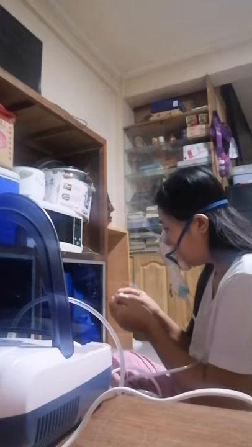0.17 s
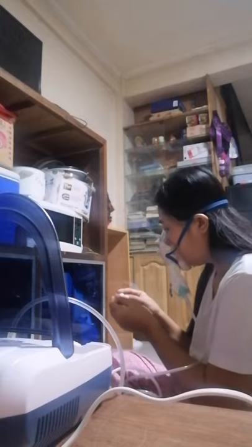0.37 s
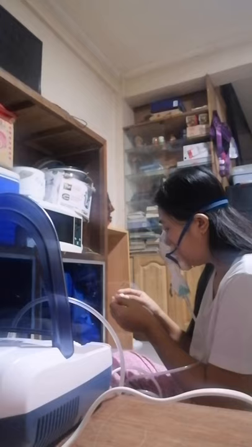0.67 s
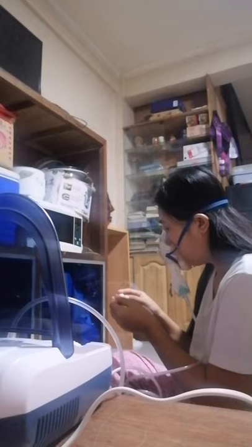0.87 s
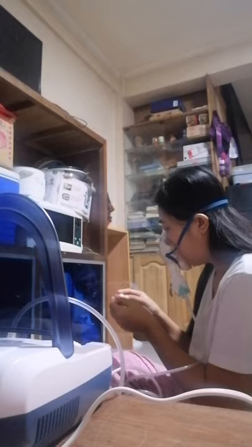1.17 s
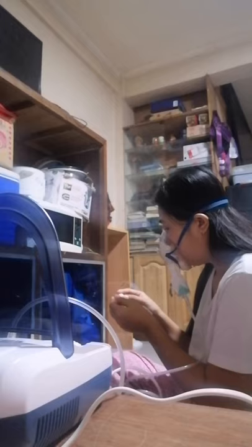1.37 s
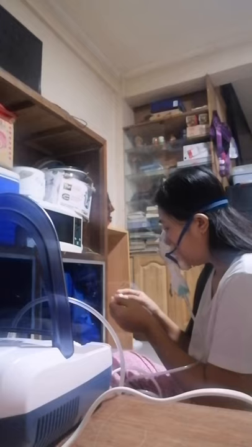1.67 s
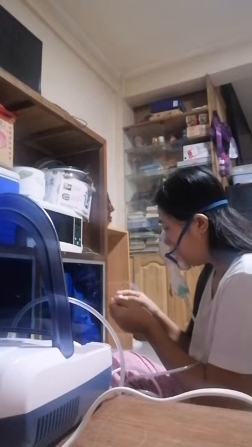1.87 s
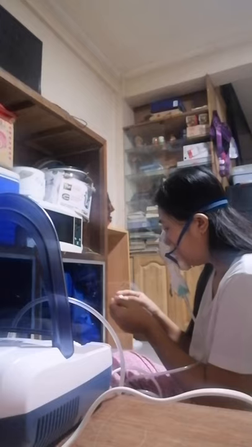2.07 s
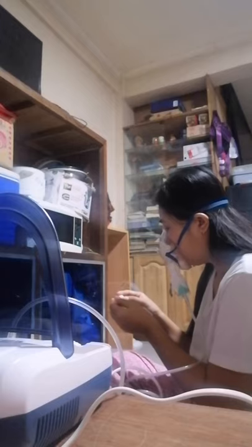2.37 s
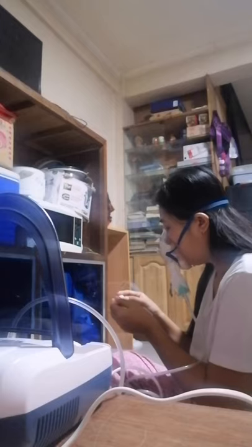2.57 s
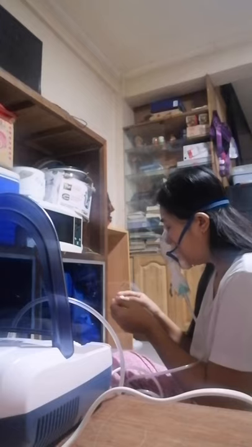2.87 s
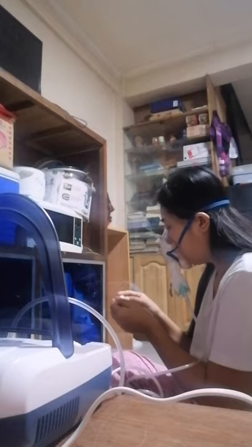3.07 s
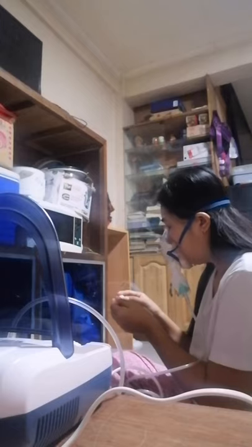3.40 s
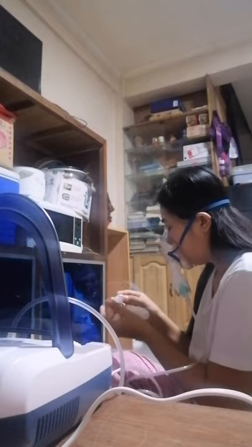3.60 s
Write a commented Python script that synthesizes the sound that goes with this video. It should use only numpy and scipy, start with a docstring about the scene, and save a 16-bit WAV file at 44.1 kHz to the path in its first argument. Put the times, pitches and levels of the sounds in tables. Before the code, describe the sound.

A nebulizer motor drones steadily indoors, close by and slightly to the right, with a rapid thumping rattle over a rough rush of air. Along with it come a high hiss, a faint whistle and small irregular spits of liquid.

```python
"""A small piston air compressor is already running on a shelf, close to a phone's right microphone.
From the start, every turn of its shaft thumps, knocks a valve and rattles the case, while the
mains hum beats against it over a rough rush. Across the room the mist jet hisses and whistles faintly.
Within moments droplets spit at the jet, and they sputter on unevenly to the end."""
import sys
import numpy as np
from scipy import signal
from scipy.io import wavfile
from scipy.ndimage import uniform_filter1d

SR = 44100
rng = np.random.default_rng(int(sys.argv[2]) if len(sys.argv) > 2 else 0)


def persist_wave(psi):
    """Save psi, clipped to +-1, as 16-bit WAV."""
    counts = np.round(np.clip(psi, -1, 1) * 32767).astype(np.int16)
    wavfile.write(sys.argv[1], SR, np.atleast_2d(counts).T)


N = 164934


def amp(db):
    return 10 ** (np.asarray(db) / 20)


def unit_rms(x):
    return x / np.sqrt(np.mean(x ** 2) + 1e-20)


def look_up(table, hz, column=1):
    rows = np.array(table, float)
    return np.interp(np.log(hz + 1), np.log(rows[:, 0] + 1), rows[:, column])


def ringing_phase(db):
    """Phases that make tones of these levels start as one sudden blow and ring on."""
    mirrored = np.log(amp(np.concatenate([db, db[-2:0:-1]])))
    return -signal.hilbert(mirrored).imag[:len(db)]


SHAFT_HZ, MAINS_HZ = 56.1486, 120.404

def shaft_turns(t, wander_turns=.0013):
    """How far the shaft has turned; its speed wanders a little."""
    wander = sum(np.sin(2 * np.pi * (hz * t + rng.random())) / np.sqrt(hz)
                 for hz in np.geomspace(.3, 3, 12))
    return SHAFT_HZ * t - .032 + wander_turns * unit_rms(wander)


# The motor's tones, each a multiple of the shaft speed with a beat tone on either side.
# Columns: multiple, level_db, below_db, above_db
MOTOR_TONES = [(1, -30.5, -67, -68), (2, -43, -66, -70), (3, -34, -68, -49), (4, -45, -74, -64),
               (5, -39, -71, -58), (6, -44, -59, -65), (7, -39, -62, -72), (8, -30, -58, -50),
               (9, -20.6, -41, -39.5), (10, -33, -50.5, -50.5), (11, -35, -55, -58), (12, -47, -51, -66),
               (13, -39, -50.5, -54), (14, -53.5, -52.5, -64), (15, -51, -61, -68), (17, -51.5, -59.5, -57),
               (18, -47, -59, -54), (19, -51, -60, -54), (20, -47, -60, -55.5), (21, -53, -67, -61),
               (22, -59, -69, -66), (23, -61.5, -73, -67), (24, -53.5, -67, -64), (34, -61, -66, -73),
               (35, -64, -73, -66)]
# The motor at the left microphone, compared with the right. Columns: pitch_hz, gain_db, lag_radians
MOTOR_AT_LEFT = [(112, -3, 0), (170, -8, .1), (230, -11, .2), (450, -11, .5), (505, -12, 1.0),
                 (620, -12.5, 1.2), (730, -9, .5), (790, -7, .9), (950, -4, 1.1), (1300, -3, 1.3),
                 (1950, -8, 2.3)]

def blows(turn, mains, lowest, highest, at_turn, gap_turns, second_gain, rings=False):
    """Two blows per turn, built from a range of motor tones that waver with the mains beat."""
    tones = np.array([row for row in MOTOR_TONES if lowest <= row[0] <= highest])
    multiples = np.arange(64)
    steps_outside = np.maximum(lowest - multiples, 0) + np.maximum(multiples - highest, 0)
    outline_db = np.interp(multiples, tones[:, 0], tones[:, 1]) - 3 * steps_outside
    second_blow = second_gain * np.exp(-2j * np.pi * multiples * gap_turns)
    phase = rings * ringing_phase(outline_db) + np.angle(1 + second_blow)
    spin = np.exp(2j * np.pi * (turn - at_turn))
    beat = np.exp(2j * np.pi * (mains - 2 * turn + .1))  # about 8 beats a second
    lopsided_beat = beat - amp(-10.5) * beat ** 2
    out = np.zeros((2, N))
    for multiple, level_db, below_db, above_db in tones:
        n, hz = int(multiple), multiple * SHAFT_HZ
        sign = 1 if n in (3, 12, 19) else -1  # these three swell; the rest mostly come early and late
        waver = amp(level_db) + amp(below_db) * beat.conj() + sign * amp(above_db) * lopsided_beat
        right = np.sqrt(2) * np.exp(1j * phase[n]) * spin ** n * waver
        lag = look_up(MOTOR_AT_LEFT, hz, column=2)
        left = amp(look_up(MOTOR_AT_LEFT, hz)) * np.exp(-1j * lag) * right
        out += [left.real, right.real]
    return out


def motor(turn, mains, uneven_db=.18):
    """Each turn thumps, knocks a valve and rattles the case, at a slightly uneven level."""
    thump = blows(turn, mains, 1, 6, at_turn=.215, gap_turns=.876, second_gain=1.1, rings=True)
    knock = blows(turn, mains, 7, 14, at_turn=.67, gap_turns=.22, second_gain=.85)
    rattle = blows(turn, mains, 15, 35, at_turn=.303, gap_turns=.284, second_gain=1.2)
    drift = uniform_filter1d(uniform_filter1d(rng.standard_normal(N), 2500), 2500)
    return (thump + knock + rattle) * amp(uneven_db * unit_rms(drift))


def mains_hum(mains, level_db=-34.5):
    """The mains power hums on one steady low tone, 6 dB softer on the left."""
    return np.sqrt(2) * amp(level_db) * np.cos(2 * np.pi * mains) * amp([[-6], [0]])


# How alike noise is at the two microphones (1 is fully alike). Columns: pitch_hz, likeness
MIC_LIKENESS = [(30, .58), (300, 1), (1900, .65), (2400, .25), (3600, .12), (4600, .65), (5900, .2),
                (6550, .75), (7400, .15), (12700, .25), (13600, .05)]

def stereo_noise(table, size, boost_db=None, patchy_db=0, flicker_db=0, extra_top_hz=0, left_lag_s=.00023):
    """Partly alike left and right noise, shaped by a table, with optional patches and flicker."""
    hop = size // 4
    frames, hz = N // hop + 5, np.fft.rfftfreq(size, 1 / SR)
    a, b, c, d, patches = rng.standard_normal((frames, len(hz), 5)).T
    patches = unit_rms(uniform_filter1d(uniform_filter1d(patches, 14, axis=0), 9, axis=1))
    flicker = unit_rms(uniform_filter1d(rng.standard_normal(frames), 5))
    right, unrelated = a + 1j * b, c + 1j * d
    hz = hz[:, None]
    alike = look_up(MIC_LIKENESS, hz)
    left = alike * right * np.exp(-2j * np.pi * hz * left_lag_s) + np.sqrt(1 - alike ** 2) * unrelated
    in_band = (hz >= table[0][0]) & (hz <= table[-1][0] + extra_top_hz)
    change_db = patchy_db * patches + flicker_db * flicker
    if boost_db:
        change_db += boost_db(hz, np.arange(frames) * hop / SR)
    spectra = np.array([left * amp(look_up(table, hz)), right * amp(look_up(table, hz, column=2))])
    spectra *= in_band * amp(change_db)
    return signal.istft(spectra, SR, nperseg=size, noverlap=size - hop, scaling="psd")[1][:, :N]


# The tone color of the low rush, before its gain. Columns: pitch_hz, left_db_per_hz, right_db_per_hz
RUSH_COLOR = [(30, -75.8, -76.1), (85, -74.8, -72.6), (200, -80.4, -73.1), (310, -82.9, -73.4),
              (420, -77.6, -68.9), (505, -71.1, -63.1), (590, -77.2, -66.8), (700, -78.6, -67.0),
              (815, -78.4, -70.3), (930, -76.5, -72), (1100, -74.6, -70.3), (1260, -78.5, -77.5),
              (1450, -81.6, -81.9), (1650, -85.4, -84.3)]

def rough_rush(pulse, gain_db=-.5):
    """A low, rough noise that swells once per turn of the shaft."""
    return amp(gain_db) * stereo_noise(RUSH_COLOR, size=2048) * (1 + .35 * pulse)


# The tone color of the jet, before its gain. Columns: pitch_hz, left_db_per_hz, right_db_per_hz
HISS_COLOR = [(1490, -84, -88), (1700, -85.5, -84), (1910, -81.5, -74.5), (2300, -90, -82.5),
              (2600, -86, -79.5), (3100, -94, -84), (3500, -94, -76.5), (4130, -94, -79),
              (4570, -79, -70.5), (4900, -84.5, -80), (5420, -82.5, -71), (6100, -84, -75.5),
              (6550, -73, -67.5), (6850, -80, -67), (7550, -85.5, -76), (8300, -88, -73.5),
              (9200, -88, -75.5), (9800, -88.5, -78), (10500, -81.5, -80), (11420, -91, -91.5),
              (11750, -85.5, -84.5), (13400, -94, -93.5), (14800, -102, -91)]

def jet_hiss(pulse, gain_db=-1.5):
    """The mist jet hisses and whistles, pulsing slightly with the shaft."""
    hiss = stereo_noise(HISS_COLOR, size=512, boost_db=jet_whistle_db,
                        patchy_db=1.5, flicker_db=.07, extra_top_hz=600)
    return amp(gain_db) * hiss * (1 + .07 * pulse)


# The whistle's rise and fall; only the distance from the average counts. Columns: time_s, level_db
WHISTLE_SWELLS = [(0.0, -56), (0.02, -46), (0.18, -52), (0.28, -41.5), (0.68, -49.5), (0.75, -44),
                  (0.92, -54.5), (0.96, -46), (1.63, -50.5), (1.7, -45), (2.24, -51), (2.28, -45),
                  (2.73, -49.5), (2.77, -44.5), (3.13, -52.5), (3.31, -46), (3.63, -54.5), (3.74, -43.5)]
# Brief flares of the lower whistle. Columns: middle_s, boost_db
WHISTLE_FLARES = [(.3, 4), (1.22, 0), (1.48, 7), (1.93, 6.5), (2.8, 4.5)]

def jet_whistle_db(hz, t):
    """The jet's two whistle bands swell and sink together; the lower one also flares briefly."""
    time_s, level_db = np.transpose(WHISTLE_SWELLS)
    swell_db = np.interp(t, time_s, level_db) - level_db.mean()
    flare_db = sum(db * np.exp(-((t - middle_s) / .016) ** 2) for middle_s, db in WHISTLE_FLARES)
    high_band = np.exp(-((hz - 6730) / 770) ** 2)
    low_band = np.exp(-((hz - 4500) / 400) ** 2)
    return swell_db * high_band + (.24 * swell_db + flare_db) * low_band


# The bigger droplets spitting at the jet, before their gain. Columns: start_s, level_db
BIG_DROPS = [(0.1575, -36), (0.3735, -34), (0.391, -33), (0.4564, -33), (0.5147, -32.5), (0.6823, -36),
             (1.0856, -32.5), (1.2476, -34), (1.284, -36), (1.3418, -40), (1.3663, -32.5), (1.4037, -35),
             (1.5733, -35), (1.9699, -33), (2.7504, -37), (2.8655, -33), (3.045, -35), (3.0644, -33),
             (3.2859, -35), (3.4855, -37), (3.5463, -38), (3.5788, -38)]

def sputters(small_count=100, small_db=-40, gain_db=-3, left_db=-18.5,
             width_hz=1500, rise_s=.002, fall_s=.013):
    """Droplets spit at the jet: short, high puffs of noise that fall in pitch, many of them small."""
    length = 4000
    out, t = np.zeros(N + length), np.arange(length) / SR
    drops = [(start_s, small_db) for start_s in rng.random(small_count) * N / SR] + list(BIG_DROPS)
    pitches_hz = 8750 + rng.uniform(-500, 500, len(drops))
    pole = np.exp(-np.pi * width_hz / SR)
    puffs = signal.lfilter([1], [1, -2 * pole, pole ** 2], rng.standard_normal((len(drops), 2, length)))
    shape = (1 - np.exp(-t / rise_s)) * np.exp(-(t / fall_s) ** 2)
    glide = 1 + .025 * (1 - t / fall_s).clip(-1.5)
    for (start_s, level_db), hz, (real, imag) in zip(drops, pitches_hz, puffs):
        tone = np.exp(2j * np.pi * np.cumsum(hz * glide) / SR)
        spit = unit_rms(((real + 1j * imag) * tone).real)  # lifts the dull puff up to the tone's pitch
        start = round(start_s * SR)
        out[start:start + length] += amp(level_db + gain_db) * shape / shape.max() * spit
    return out[:N] * amp([[left_db], [0]])


def scene():
    t = np.arange(N) / SR
    turn = shaft_turns(t)
    mains = MAINS_HZ * t - .395  # counts cycles of the hum
    pulse = np.cos(2 * np.pi * (turn - .62))  # peaks once per turn
    return motor(turn, mains) + mains_hum(mains) + rough_rush(pulse) + jet_hiss(pulse) + sputters()


def record(dry, cutoff_hz=15130):
    """The phone cuts off the highest treble."""
    low_pass = signal.firwin(2047, cutoff_hz, window=("kaiser", 10), fs=SR)
    return signal.oaconvolve(dry, low_pass[None], "same")


dry = scene()
out = record(dry)
persist_wave(out)
```